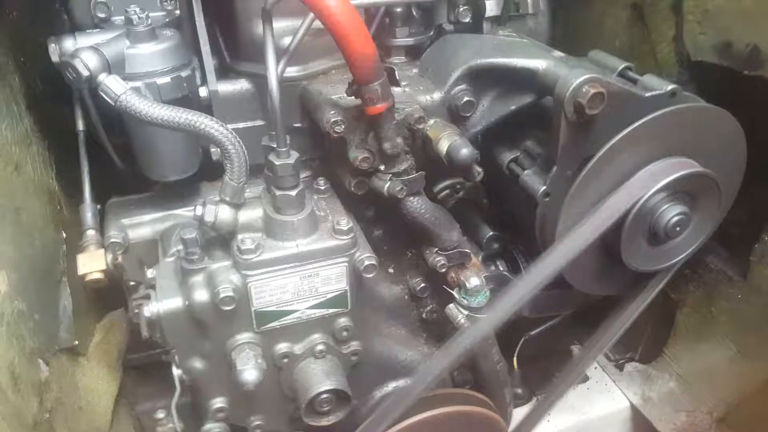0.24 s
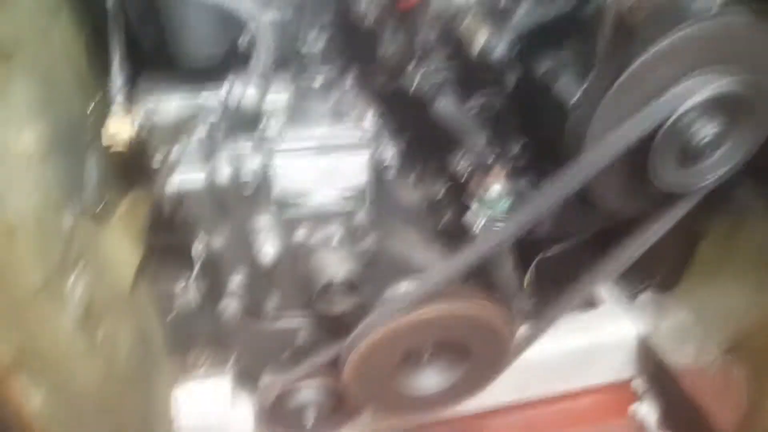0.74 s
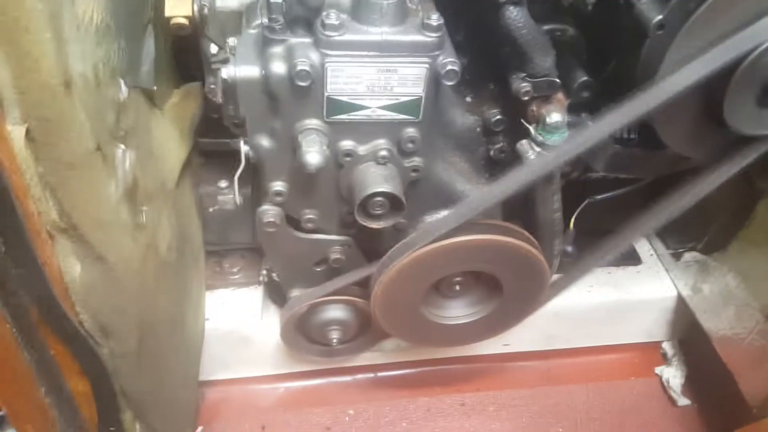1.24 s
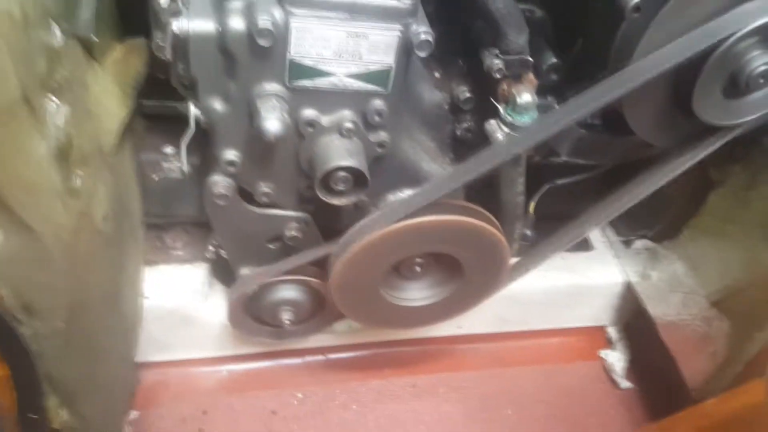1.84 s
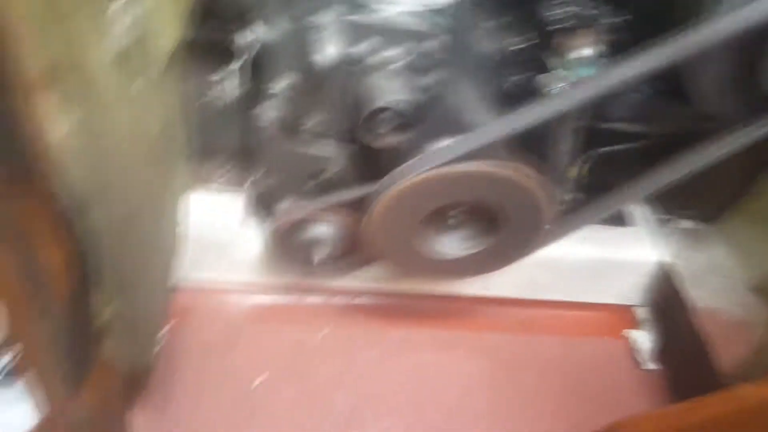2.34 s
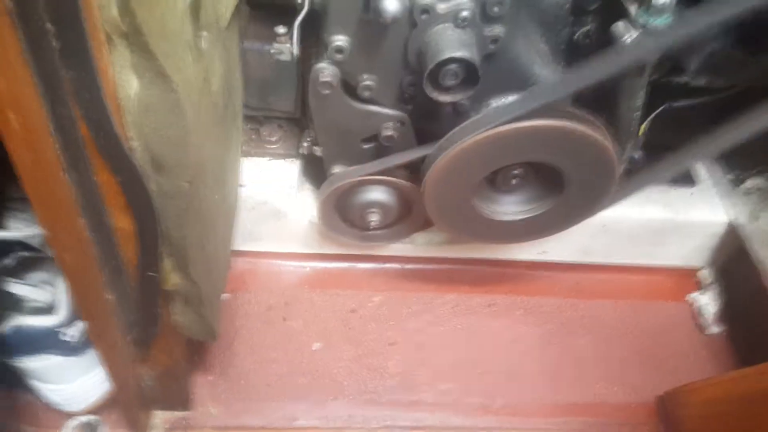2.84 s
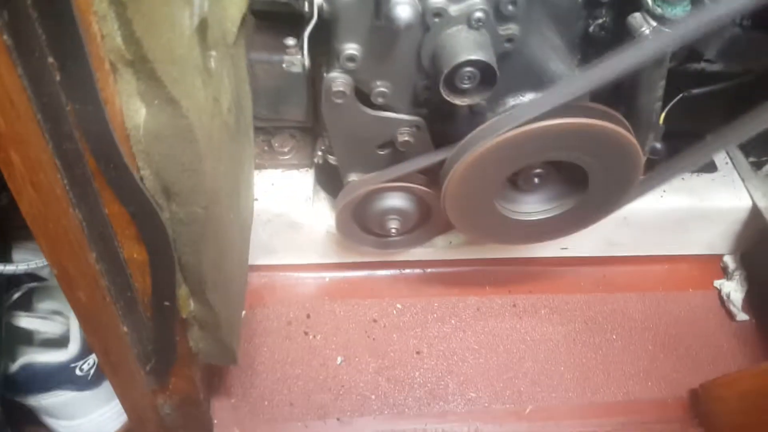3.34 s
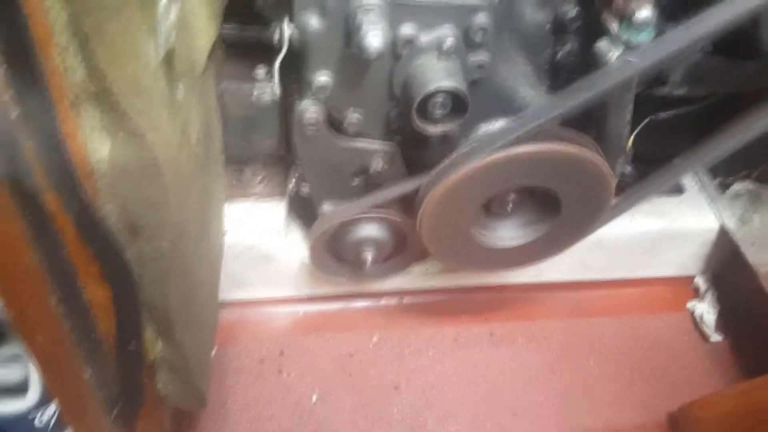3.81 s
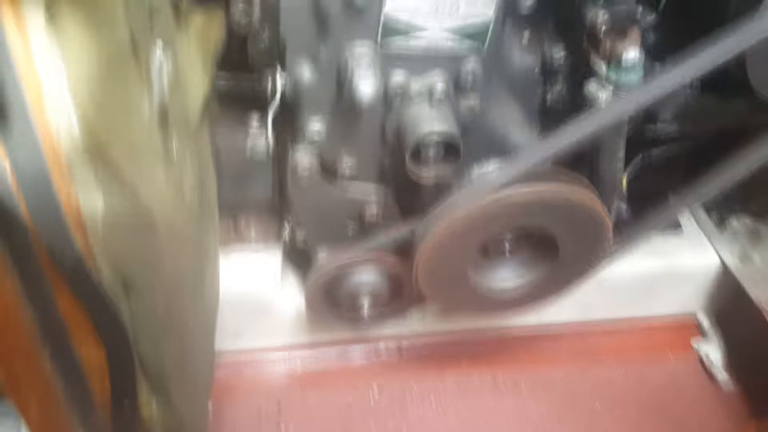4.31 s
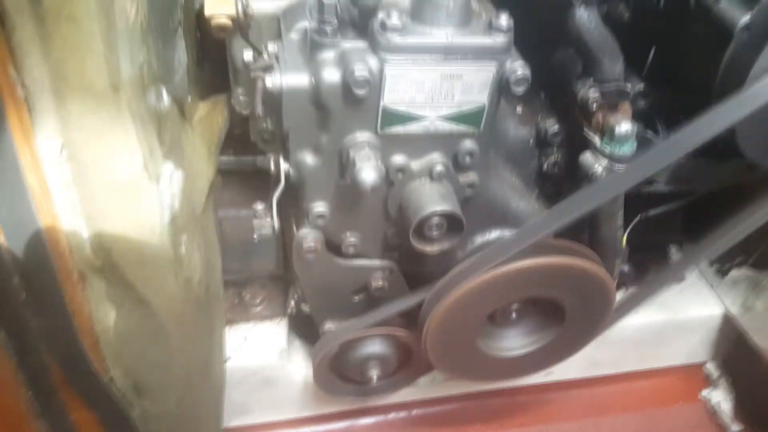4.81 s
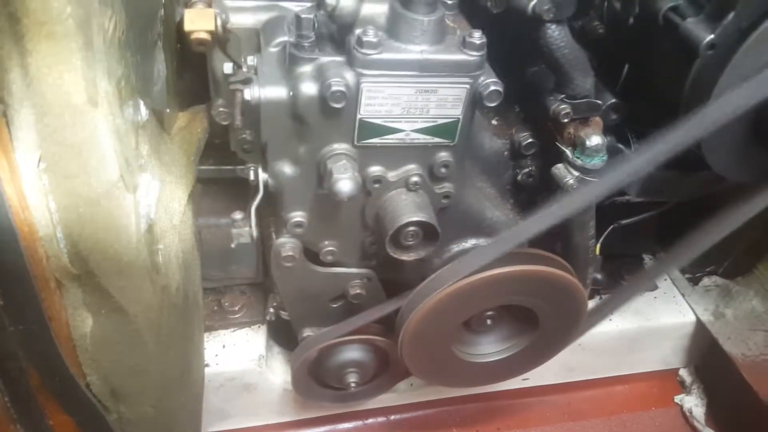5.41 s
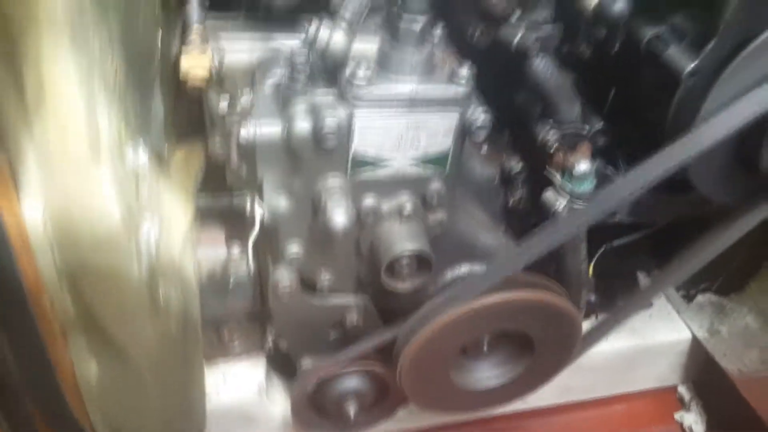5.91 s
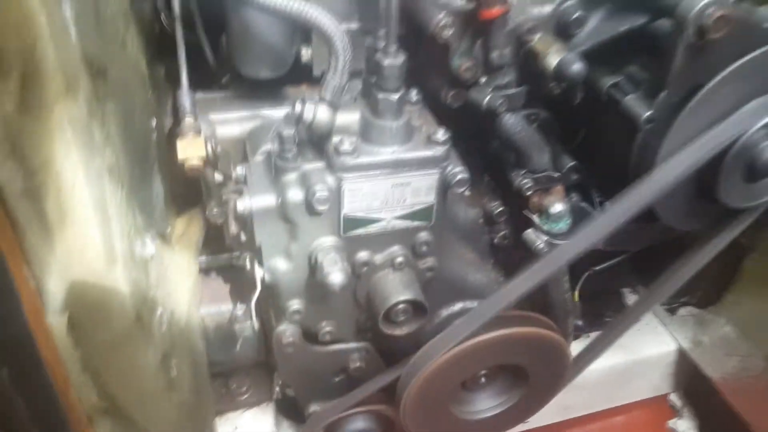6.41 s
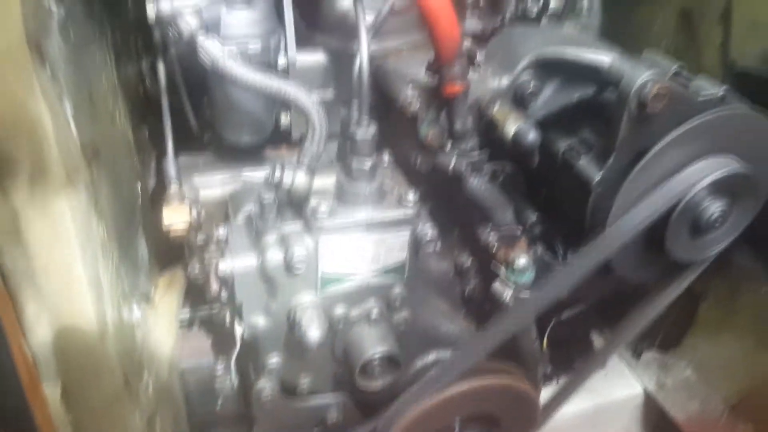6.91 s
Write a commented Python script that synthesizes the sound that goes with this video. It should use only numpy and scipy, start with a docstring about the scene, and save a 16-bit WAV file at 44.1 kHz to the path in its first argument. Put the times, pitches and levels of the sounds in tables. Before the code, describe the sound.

Silence until about 0.28 seconds, then a two-cylinder marine diesel is abruptly present, already idling at roughly 1050 revolutions per minute, with only tiny wavering. Nearly nine cycles pass each second. In each, two firings come about 30 milliseconds apart, ringing the block with a hard, clanking, fizzing knock; then two deep, airy intake gulps thump, while valve contacts tick and casing jolts hum low. Gears, belt and pump make a rough, lumpy rattle strongest in the bass. Between 0.65 and 1.04 seconds a few sharp bright clicks snap toward the left. The close hand-held stereo microphone recedes a little around 2.7 seconds, while the knocks turn brighter, then nears by 3.85 and is fullest around 5.3. Individual knocks vary, some duller, some sharper. Bass sits central, metallic ringing spreads wide and the padded compartment adds a short reverberation. The engine keeps running to the end, about 7.1 seconds.

```python
"""After a short silence, gear clatter and an intake gulp start abruptly: a two-cylinder marine diesel idles
in a padded engine compartment, close to a hand-held stereo microphone.
In every 720 degree cycle the cylinders fire about 185 degrees apart and ring the modes of the block.
Valve contacts ring the rockers, two intake gulps thump through the air box, and jolts ring the casing.
Gears, belt and pump add shaped noise, and a few bright clicks are bursts of filtered noise."""
import sys
import numpy as np
from scipy import signal
from scipy.fft import rfft, irfft, next_fast_len
from scipy.io import wavfile
from scipy.ndimage import uniform_filter1d

SR = 44100
rng = np.random.default_rng(int(sys.argv[2]) if len(sys.argv) > 2 else 0)


def waveform_to_disk(signal):
    """Save audio, clipped to [-1, 1], as 16-bit WAV at the path in sys.argv[1]."""
    frames = np.transpose(np.atleast_2d(signal))
    scaled = np.clip(frames, -1, 1) * 32767
    samples = np.round(scaled).astype(np.int16)
    wavfile.write(sys.argv[1], SR, samples)


N = 315315

# Likeness of the sound at the two ports. Each row: frequency in Hz, left-right correlation.
PORT_LIKENESS = [(60, 1.0), (180, 1.0), (550, 0.96), (1650, 0.27), (4970, -0.12), (15000, -0.02)]
USUAL_DB = -9.3  # nominal gulp level in dB at the usual microphone distance
SCATTER_DB = 0.69  # standard deviation of firing strength in dB; gulps scatter half as much
SIDES = np.array([[.5], [-.5]])  # shares of a left-right difference for the left and right port


def amp(db):
    """Level: 20 dB is a factor of ten in amplitude."""
    return 10 ** (np.asarray(db) / 20)


def along(points, hz):
    """Spectral curve: (Hz, value) points joined by straight lines on a log frequency axis."""
    f, v = np.transpose(points)
    return np.interp(np.log(hz + 1), np.log(f + 1), v)


def filtered(x, response):
    """Linear filtering: the spectrum is multiplied by a response, a function of frequency in Hz."""
    m = next_fast_len(x.shape[-1] + 8192)
    spectrum = rfft(x, m) * response(np.fft.rfftfreq(m, 1 / SR))
    return irfft(spectrum, m)[..., :x.shape[-1]]


def place(times, sounds):
    """Superposition: stereo sounds (events, 2, samples) add up, each from its time in seconds."""
    out = np.zeros((2, N + SR))
    for s, sound in zip(times, sounds):
        out[:, round(s * SR):][:, :sound.shape[1]] += sound
    return out[:, :N]


def ring(hz, t60, level_db, phase, attack):
    """Modal decay: each blow (blows, 2, modes) excites sinusoids that die exponentially; attack in s."""
    t = np.arange(SR // 6) / SR
    modes = amp(-60 * t / t60[:, None]) * np.exp(2j * np.pi * hz[:, None] * t)
    excitation = amp(level_db) * np.exp(1j * phase)
    return (excitation @ modes).imag * (1 - np.exp(-t / attack))


def habit(hz, count, apart_hz=1900):
    """Spatial coherence: phases a part repeats at every blow differ more between ports for high modes."""
    apart = np.minimum(hz / apart_hz, 2) ** 2 * rng.standard_normal((count, 1, len(hz)))
    return rng.uniform(0, 2 * np.pi, (count, 1, len(hz))) + apart * SIDES


def crank(share):
    """Crank kinematics: integrated speed gives the times of fixed shares of the 720 degree cycle."""
    # The governor hunts slightly. Each row: time in seconds, speed in rpm.
    speed = [(0.3, 1049.1), (1.1, 1049.4), (1.55, 1048.4), (1.75, 1047.2), (2.3, 1048.6), (2.6, 1044.3),
             (2.75, 1048.8), (3.1, 1049.9), (4.1, 1048.8), (4.4, 1047.0), (5.4, 1048.5), (5.8, 1044.9),
             (5.95, 1051.3), (6.3, 1049.7), (6.8, 1049.0), (7.1, 1046.5)]
    first_s = .3072  # a cycle starts with the front firing
    t = np.arange(N) / SR
    cycles = np.cumsum(np.interp(t, *np.transpose(speed))) / (120 * SR)  # two turns a cycle
    cycles = cycles - np.interp(first_s, t, cycles)
    wanted = (np.arange(-1, cycles[-1])[:, None] + share).ravel()
    return np.interp(wanted, cycles, t, right=N / SR)  # what falls after the end is dropped


def near(s):
    """Distance law: dB over the level at the usual distance as the microphone comes near and recedes."""
    # Microphone approach. Each row: time in seconds, nominal level of an intake gulp in dB.
    approach = [(0.3, -9), (0.7, -11.5), (1.0, -9), (1.2, -9), (1.35, -8.5), (1.55, -10.5), (2.2, -11.0),
                (2.4, -10.5), (2.55, -11.5), (2.72, -14.5), (2.9, -13.5), (3.15, -11), (3.6, -9.7),
                (3.85, -7.5), (4.3, -8.5), (5.3, -6.5), (5.7, -8), (6.4, -8.5), (7.1, -9)]
    return np.interp(s, *np.transpose(approach)) - USUAL_DB


def clatter():
    """Broadband noise: gears, belt and pump rattle in random lumps, near mono in the bass."""
    # Rattle spectrum. Each row: frequency in Hz, relative level per Hz in dB.
    rattle = [(18, -50), (30, -19), (109, -2), (280, -9), (499, -19), (1040, -17.5), (1320, -21),
              (2120, -18), (3310, -24.5), (4300, -36), (4910, -38), (9710, -53), (12000, -53), (16000, -74)]

    def mid_side(hz):
        # the angle splits the power so that left and right have the wanted correlation
        angle = np.arccos(np.clip(along(PORT_LIKENESS, hz), -1, 1)) / 2
        level_db = along(rattle, hz) - 6.5 * (hz < 330)
        return amp(level_db) * [np.cos(angle), np.sin(angle)]

    lumps = uniform_filter1d(rng.standard_normal(N), size=150)
    pair = rng.standard_normal((2, N)) * amp(3 * lumps / lumps.std())
    mid, side = filtered(pair, mid_side)
    level_db = near(np.arange(N) / SR) - 30.5
    return amp(level_db) * np.array([mid + side, mid - side]) / mid.std()


def intake():
    """Cavity resonance: each gulp starts as suction and swings into a crest while the air box rings."""
    # Air box modes. Each row: frequency in Hz, t60 in seconds, relative level in dB for the rear gulp
    # and for the front gulp.
    air_box = [(79.2, 0.098, -16.9, -51.0), (106.3, 0.126, 0.7, 2.3), (127.4, 0.084, 5.5, 2.1),
               (153.0, 0.023, 11.7, 19.5), (289.0, 0.034, -3.2, 4.5)]
    hz, t60, rear_db, front_db = np.transpose(air_box)
    s = crank([.8227, .5696])  # rear, front gulp (share of the cycle)
    cylinder = np.arange(len(s)) % 2  # 0 rear, 1 front
    gulp_db = USUAL_DB + near(s) + np.array([.3, -.3])[cylinder]
    gulp_db = gulp_db + .5 * SCATTER_DB * rng.standard_normal(len(s))
    level_db = np.array([rear_db, front_db])[cylinder] + gulp_db[:, None]
    level_db = level_db[:, None].repeat(2, axis=1)  # alike at both ports
    rise_s = np.array([.0057, .0053])[cylinder]  # the gulp starts this long before its crank angle
    swell_s = np.array([.0106, .015])[cylinder, None, None]
    return place(s - rise_s, -ring(hz, t60, level_db, 0, attack=swell_s))


def valves():
    """Impact excitation: cams lift and seat valves at fixed crank angles, with a snap and rocker ring."""
    # Valve gear contacts. Each row: share of the cycle after the front firing, relative ring level in dB,
    # relative snap level in dB.
    contacts = [(.385, -6, -41), (0.529, -5.5, -37), (0.649, -5, -37), (.71, -20.5, -35), (0.832, -8, -24)]
    # Rocker modes. Each row: frequency in Hz, t60 in seconds, relative level in dB, left-right dB.
    rocker = [(580, 0.034, 0, -4.5), (1057, 0.036, 2, -0.5), (1486, 0.019, -6, 0), (2045, 0.016, -5, 15.5),
              (2310, 0.029, -14, 25), (3030, 0.014, -15, 30.5), (4750, 0.033, -17, -8.5),
              (4860, 0.034, -14.5, 9)]
    share, ring_db, snap_db = np.transpose(contacts)
    hz, t60, mode_db, pan_db = np.transpose(rocker)
    s = crank(share)
    near_db = near(s) - 20
    # chance for level and for phase, wider in the high modes
    chance = rng.standard_normal((len(s), 2, 1, len(hz))) * np.minimum(hz / 1500, 1)
    level_db = (np.resize(ring_db, len(s)) + near_db)[:, None, None] + mode_db + pan_db * SIDES
    phase = np.resize(habit(hz, count=len(share)), (len(s), 2, len(hz)))
    rings = ring(hz, t60, level_db + 3 * chance[:, 0], phase + 0.84 * chance[:, 1], attack=0.00017)
    snap_db = np.resize(snap_db, len(s)) + near_db + 4 * rng.standard_normal(len(s))
    decay_db = -60 * np.arange(rings.shape[-1]) / SR / 0.015
    snaps = rng.standard_normal(rings.shape) * amp(snap_db[:, None, None] + decay_db)
    return place(s, rings + snaps)


def strengths(s, cylinder):
    """Source strength: dB of each firing in the low ring, at 2 kHz, at 3 kHz and in the fizz."""
    # Brighter ring as the microphone turns. Each row: time in seconds, relative level in dB of the front
    # cylinder at 2 kHz, of the rear at 2 kHz, of the front at 3 kHz, and of the treble of both.
    bright = [(.3, -5, 2, -4, -1), (.7, -6, -2.5, -8.5, 1), (1.2, -0.5, -1.5, -0.5, -0.5),
              (1.9, -2.7, -1.5, -0.5, 0), (2.8, 1.5, -0.5, 4.5, 0), (3.5, -2.5, 2, -1.2, -0.5),
              (4.2, -4, -2.1, 1.5, -1), (5, -2.5, .7, 0.5, 0), (5.8, 0.2, 0.5, 1.5, 0),
              (6.4, 2, 0.5, -1.5, 1), (7.1, 3.5, 1.2, -.9, 1)]
    # Firings whose ring stands out: louder, weaker, brighter or duller. Each row: time in seconds,
    # added dB at 2 kHz, added dB at 3 kHz.
    standing_out = [(.65, -11, -2), (.879, 0, 5), (1.023, 0, 5), (1.137, 4, -5), (1.366, -1, 3.5),
                    (1.595, -4, -3), (1.794, 2.5, 2.5), (1.938, 4, -10), (2.023, 1, -4), (2.053, 2, 4),
                    (2.138, -2, -7), (2.711, 0, 1.5), (2.74, 2, 3), (2.825, -4.5, -6.5), (3.084, -5, -3),
                    (3.283, -6, -7), (3.312, -0.5, -5), (3.626, -1, 3.5), (3.969, -1, -6), (5.228, -8, -14),
                    (5.601, 4.5, 3.5), (5.801, -5, -7), (5.831, -2.5, -2), (6.03, 3.5, 4),
                    (6.373, 2.5, 6.5), (6.602, -2, -8), (6.86, 3.5, 5.5), (6.945, 4, 3.5)]
    low_follows, high_follows = 0.89, 0.65  # dB for each dB of nearness
    turned = [np.interp(s, np.transpose(bright)[0], db) for db in np.transpose(bright)[1:]]
    front_db, rear_db, ping_db, treble_db = turned
    own_db = np.outer(near(s), [low_follows, high_follows, high_follows, high_follows])
    own_db += SCATTER_DB * rng.standard_normal(own_db.shape)
    own_db[:, 0] += np.array([-0.5, -3])[cylinder]  # front, rear
    own_db[:, 1] += np.where(cylinder, rear_db, front_db)
    own_db[:, 2] += np.where(cylinder, 0, ping_db)
    own_db[:, -1] += treble_db
    for when, *more_db in standing_out:
        own_db[np.argmin(abs(s - when)), 1:3] += more_db
    return own_db


def fizz(shape, cylinder, treble_db):
    """High modal density: ringing too dense to tell apart is noise with a fast and a slow decay."""
    # Fizz spectrum. Each row: frequency in Hz, relative level per Hz in dB.
    spectrum = [(3000, -120), (4000, -4), (6000, -1.5), (7200, -8.5), (8100, -6.5), (9800, -15.5),
                (11000, -13), (11900, -8.5), (12600, -10), (14000, -23), (16000, -32), (17000, -120)]
    # Fizz direction. Each row: frequency in Hz, left-right dB.
    direction = [(4000, 11), (8000, 4), (12000, -4), (16000, 14)]
    t = np.arange(shape[-1]) / SR
    attack_s = np.array([.001, .002])[cylinder, None, None]  # front, rear
    decay = amp(-60 * t / 0.035) + amp(-17 - 60 * t / 0.28)
    burst = decay * (1 - np.exp(-t / attack_s))
    colour = lambda hz: amp(along(spectrum, hz) + along(direction, hz) * SIDES)
    noise = filtered(rng.standard_normal(shape), colour)
    level_db = treble_db + np.array([-27.5, -26.5])[cylinder]  # front, rear
    return noise / noise.std() * burst * amp(level_db)[:, None, None]


def knock():
    """Modal excitation: combustion rings the block, low modes alike each cycle and high modes more loosely."""
    # Block modes. Each row: centre frequency in Hz, t60 in seconds, relative level in dB from the front
    # cylinder and from the rear cylinder, left-right dB.
    block = [(588, 0.07, -1.5, -10, 0), (720, 0.05, -20, -18, 0), (850, 0.057, -3, 1.5, -1),
             (1008, 0.084, -1, 3, 1.5), (1062, 0.055, 5, -16.5, 2), (1170, 0.037, -8.5, -1.5, 3),
             (1330, 0.064, -12, -10.5, 7), (1525, 0.061, -5, -9, -7.5), (1670, 0.039, -9.5, -14, 9.5),
             (1776, 0.18, -17, -8, 9), (1901, 0.061, -10, -5, -2), (2073, 0.06, -1.5, -13.5, 10.5),
             (2088, 0.034, -5, 2, 8), (2284, 0.06, -3, -11.5, 6), (2548, 0.037, -12, -7.5, 13),
             (2882, 0.042, -11, -7.5, 11.5), (3198, 0.039, -4, -15, 13), (3422, 0.041, -4.5, -8.5, 10.5),
             (3680, 0.051, -16, -14.5, 4), (3973, 0.052, -13.5, -21.5, 0), (4880, 0.041, -19, -15.5, -3.5),
             (5350, 0.04, -24.5, -25, 13), (11000, 0.04, -32, -19, 1), (11550, 0.035, -36, -20, -8),
             (12200, 0.035, -38, -20.5, -8)]
    # Firing points, front then rear. Each entry: share of the cycle.
    fire_at = [0, .257]
    s = crank(fire_at)
    cylinder = np.arange(len(s)) % 2  # 0 front, 1 rear
    hz, t60, front_db, rear_db, pan_db = np.repeat(block, 3, axis=0).T
    # every mode is a close group of three
    hz = hz + np.minimum(0.027 * hz, 110) * np.tile([-1, 0, 1], len(block))
    own_db = strengths(s, cylinder)
    colour_db = [np.interp(hz, [990, 2050, 3030, 5600], row) for row in own_db]
    # chance for level and for phase, wider in the high modes
    chance = rng.standard_normal((len(s), 2, 1, len(hz))) * np.minimum(hz / 2500, 1.5)
    mode_db = np.array([front_db, rear_db])[cylinder] + colour_db
    level_db = -21.5 + mode_db[:, None] + pan_db * SIDES
    phase = habit(hz, count=2)[cylinder] + 0.74 * chance[:, 1]
    blows = ring(hz, t60, level_db + 1.05 * chance[:, 0], phase, attack=0.0011)
    # the fuel burns raggedly: weaker blows follow the first, longer in the rear cylinder
    t = np.arange(SR // 50) / SR
    burn_s = np.array([.012, .02])[cylinder, None, None]  # t60
    burn = amp(-27.5 - 60 * t / burn_s) * rng.standard_normal((len(s), 1, len(t)))
    blows = blows + signal.fftconvolve(blows, burn, axes=2)[..., :blows.shape[-1]]
    # however the phases fall, a firing hands the block its due energy
    due = np.sum(amp(2 * level_db) * t60, axis=(1, 2)) * SR / (4 * np.log(1000))
    blows = blows * np.sqrt(due / np.sum(blows ** 2, axis=(1, 2)))[:, None, None]
    return place(s, blows + fizz(blows.shape, cylinder, own_db[:, -1]))


def compartment(x):
    """Reverberation: the walls answer, each frequency decays at its own rate, and the bass is port-alike."""
    # Wall reverberation. Each row: frequency in Hz, t60 in seconds.
    walls = [(100, 0.2), (500, 0.36), (2000, 0.25), (6000, 0.18), (14000, 0.16)]
    hz, t, z = signal.stft(rng.standard_normal((2, SR // 3)), SR, nperseg=256)
    like = np.clip(along(PORT_LIKENESS, hz), 0, 1)[:, None]
    z = np.array([z[0], like * z[0] + np.sqrt(1 - like ** 2) * z[1]])
    z = z * amp(-60 * t / along(walls, hz)[:, None])
    tail = signal.istft(z, SR, nperseg=256)[1]
    return signal.fftconvolve(x, tail / np.linalg.norm(tail[0]), axes=1)[:, :N]


def casing():
    """Low structural modes: pistons and cams jolt casing and floor boards in the same order every cycle."""
    # Modes of casing and floor boards. Each row: frequency in Hz, t60 in seconds.
    low_modes = [(183.5, 0.216), (203.4, 0.252), (273.1, 0.082), (390.2, 0.18), (458, 0.131)]
    # Jolts of pistons and cams. Each row: share of the cycle after the front firing, then the nominal level
    # in dB into each of the five low modes.
    jolts = np.array([(0.0017, -60.0, -60.0, -18.1, -60.0, -60.0),
                      (0.0982, -60.0, -60.0, -18.9, -29.4, -60.0),
                      (0.1746, -34.4, -26.2, -60.0, -32.6, -33.5),
                      (0.3121, -27.5, -60.0, -19.9, -60.0, -60.0),
                      (0.384, -60.0, -37.7, -29.9, -23.7, -27.2),
                      (0.442, -60.0, -29.2, -45.8, -33.7, -60.0)])
    hz, t60 = np.transpose(low_modes)
    s = crank(jolts[:, 0])
    level_db = np.resize(jolts[:, 1:], (len(s), len(hz))) + near(s)[:, None]
    level_db = level_db + 2.63 * rng.standard_normal(level_db.shape)
    sounds = ring(hz, t60, level_db[:, None] + [[-.2], [.2]], 0, attack=.0006)
    return place(s, sounds)


def clicks():
    """Transient noise: short bright snaps near the left port, without wall reverberation."""
    # Clicks. Each row: start in seconds, nominal level in dB, left-right dB.
    snaps_heard = [(0.65, -21, 16), (0.8324, -17.5, 17), (0.9746, -15.5, 28.5), (0.989, -14, 8),
                   (1.0365, -17, 11)]
    s, nominal_db, pan_db = np.transpose(snaps_heard)
    t = np.arange(SR // 50) / SR
    bursts = rng.standard_normal((len(s), 1, len(t))) * amp(-60 * t / 0.006)
    snaps = filtered(bursts, lambda hz: hz / (hz + 2500) / (1 + (hz / 12000) ** 2))
    level_db = nominal_db[:, None] - 1.5 + np.outer(pan_db, SIDES)
    return place(s, snaps * amp(level_db)[..., None])


def scene():
    """Superposition: the metal sounds and their reverberation add to the other sources."""
    metal = knock() + valves()
    return metal + amp(-10.5) * compartment(metal) + intake() + casing() + clatter() + clicks()


def record(dry):
    """Transduction: ports lose deep bass, and an abrupt start, soft limiting and a band limit follow."""
    start_s, top_hz = .281, 16300
    left_leads_s = 5.5e-5  # the left port is a little nearer

    def ports(hz):
        bass_loss = hz ** 4 / (hz ** 4 + 29 ** 4)
        return np.exp(2j * np.pi * hz * left_leads_s * SIDES) * bass_loss

    heard = signal.lfilter(*signal.butter(2, 30, "high", fs=SR), filtered(dry, ports))
    on = heard * (np.arange(N) / SR > start_s)
    rounded = on / (1 + np.abs(on) ** 8) ** (1 / 8)  # only the highest peaks are rounded off
    return filtered(rounded, lambda hz: hz < top_hz)


dry = scene()
out = record(dry)
waveform_to_disk(out)
```